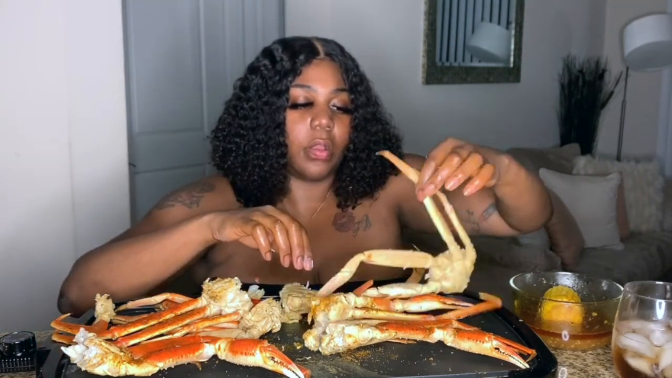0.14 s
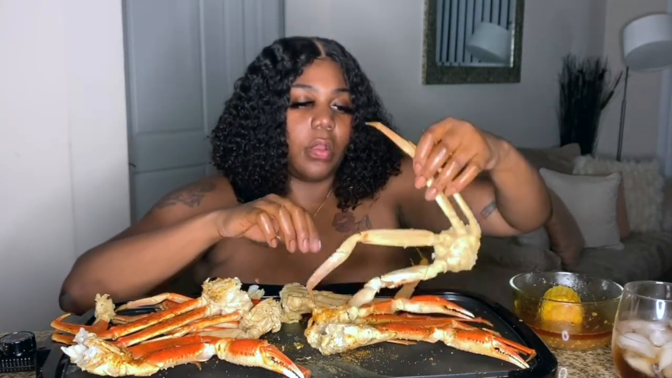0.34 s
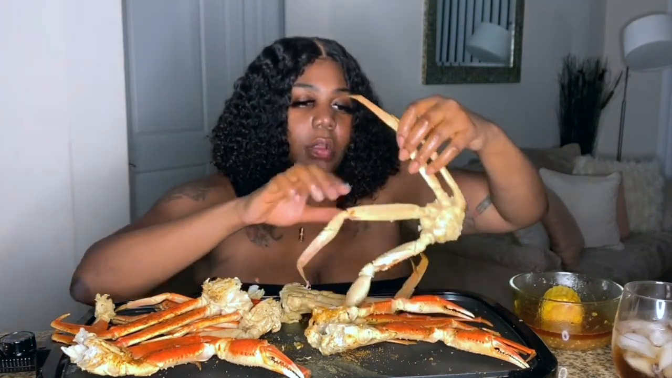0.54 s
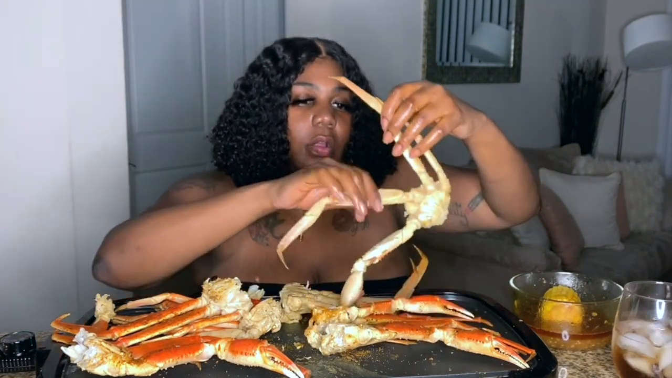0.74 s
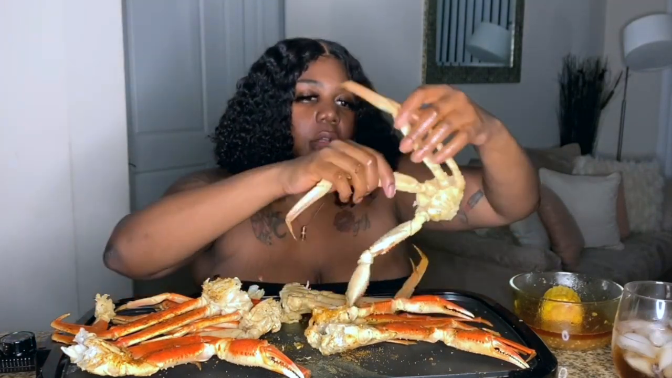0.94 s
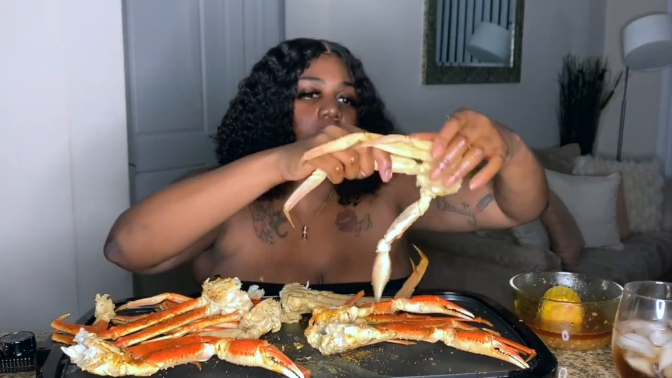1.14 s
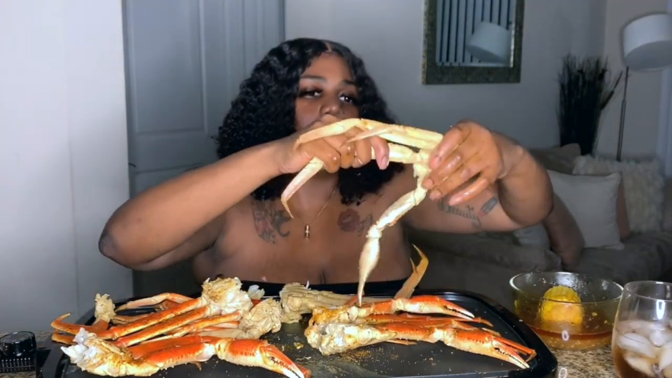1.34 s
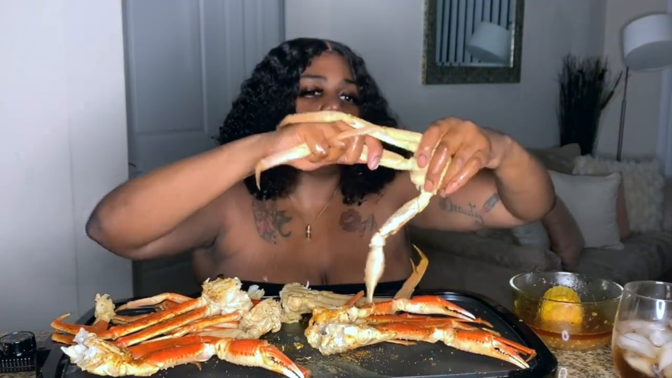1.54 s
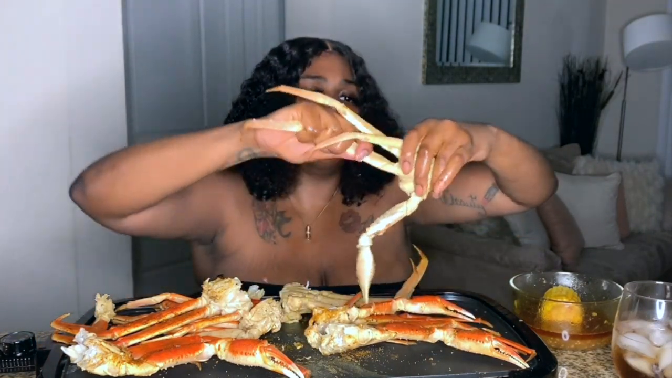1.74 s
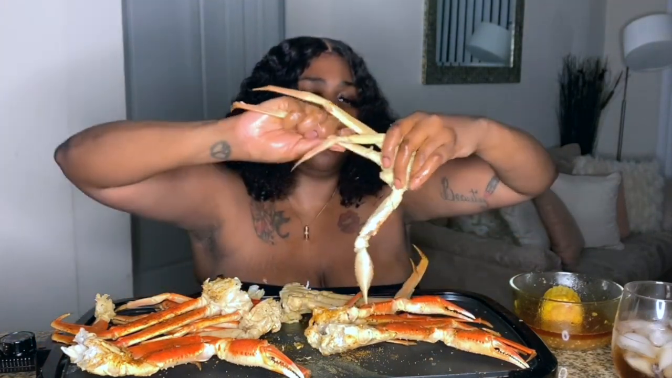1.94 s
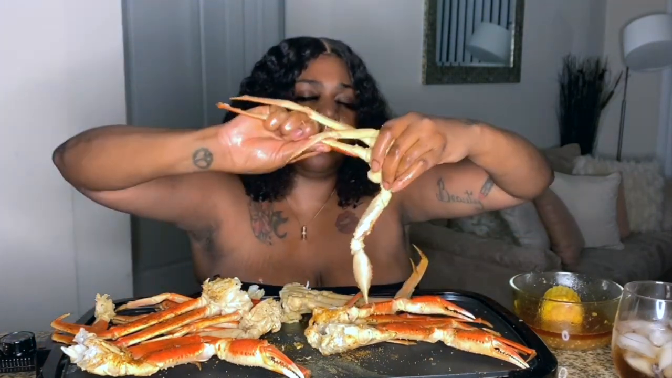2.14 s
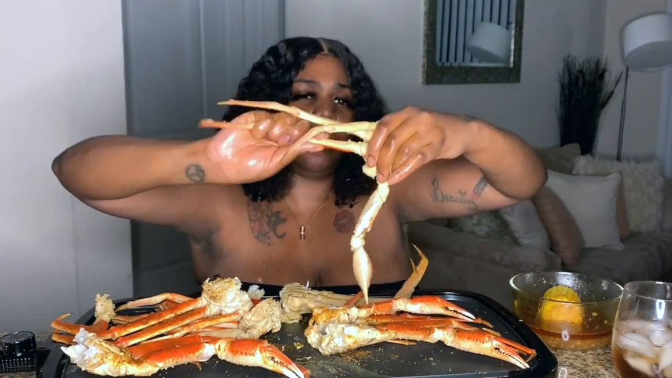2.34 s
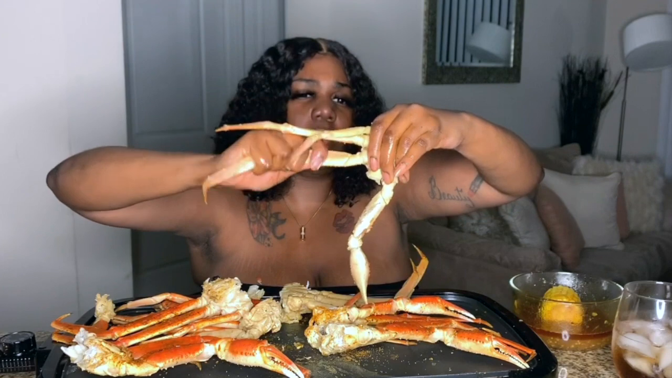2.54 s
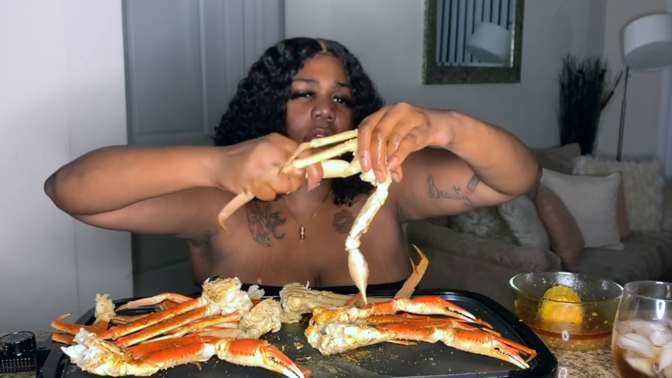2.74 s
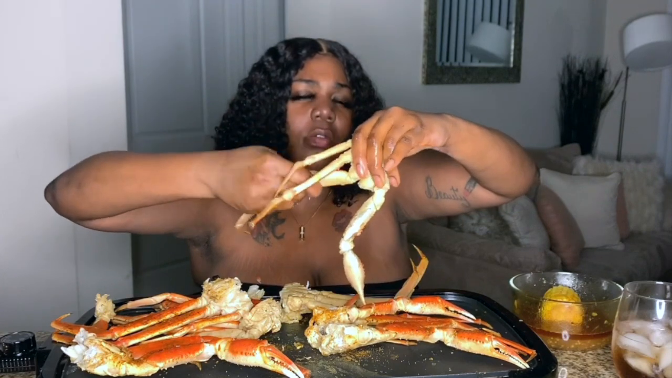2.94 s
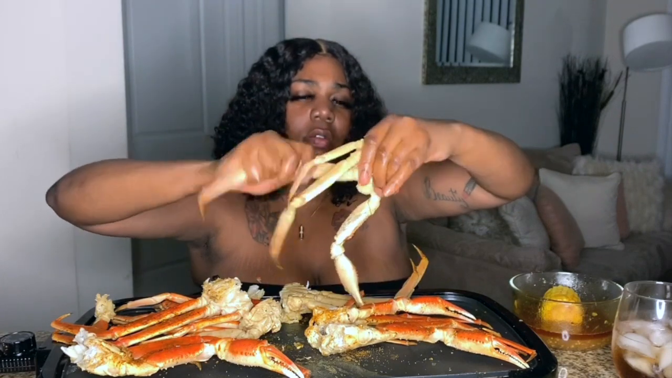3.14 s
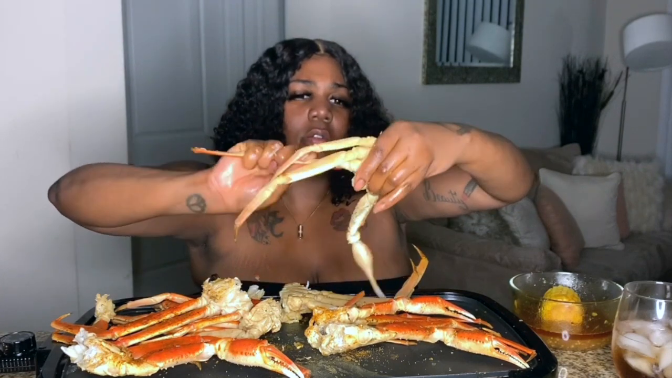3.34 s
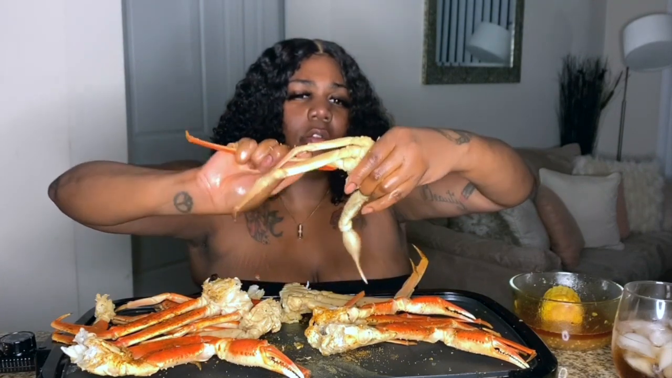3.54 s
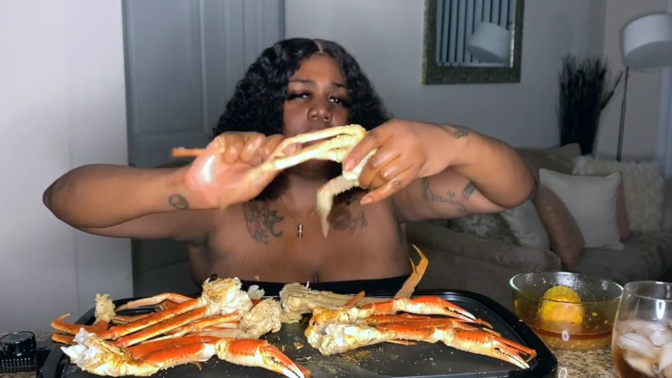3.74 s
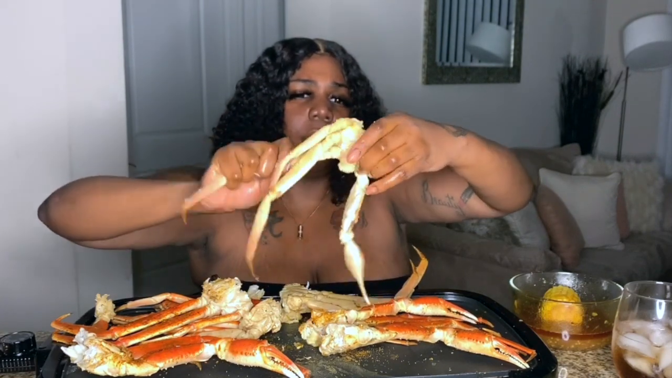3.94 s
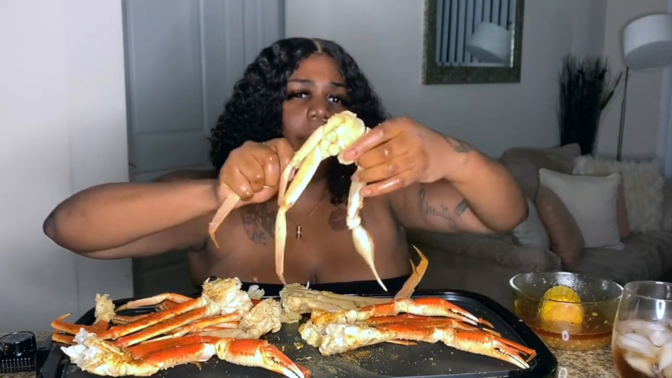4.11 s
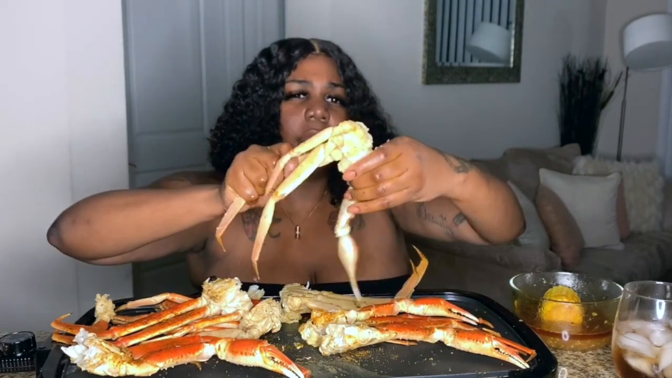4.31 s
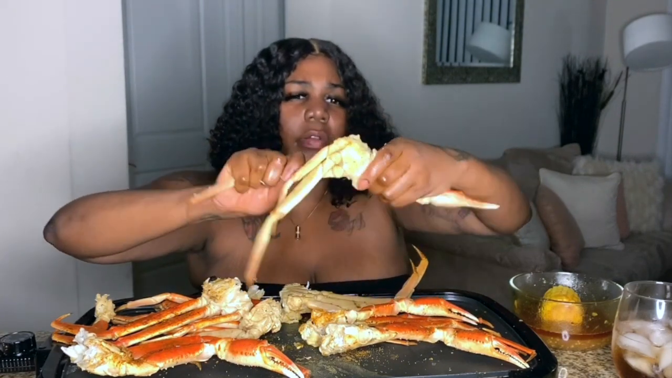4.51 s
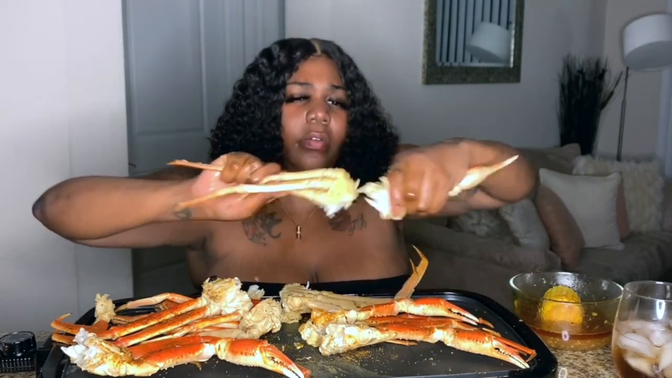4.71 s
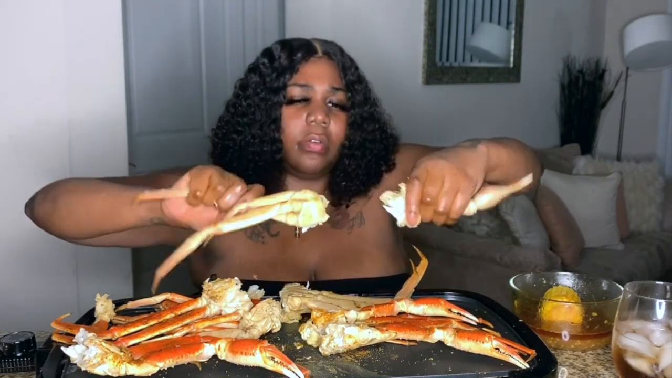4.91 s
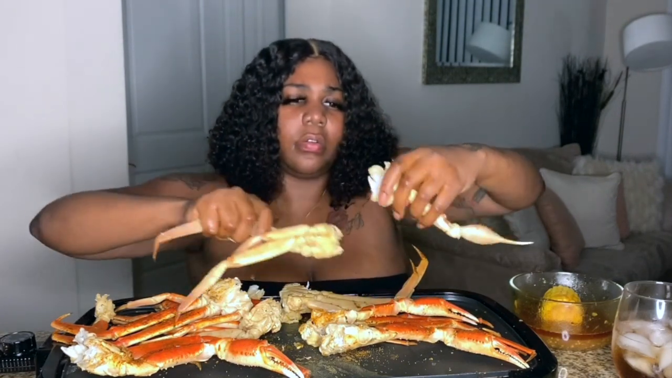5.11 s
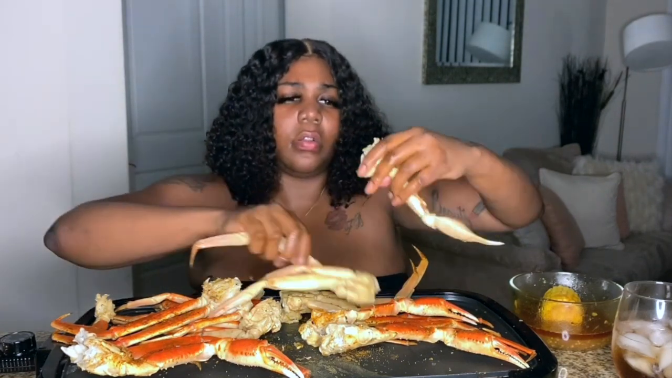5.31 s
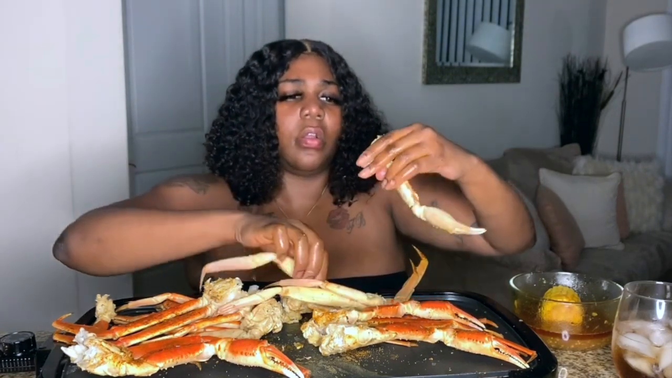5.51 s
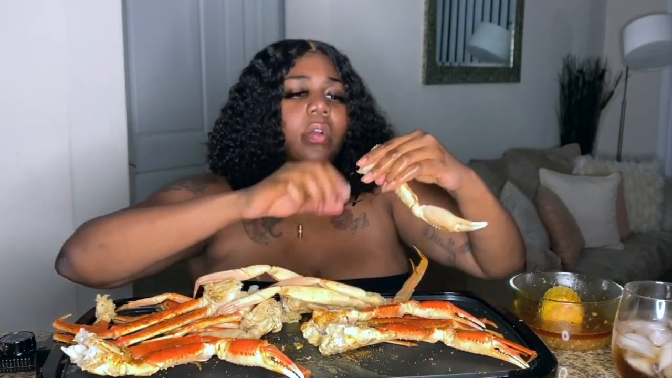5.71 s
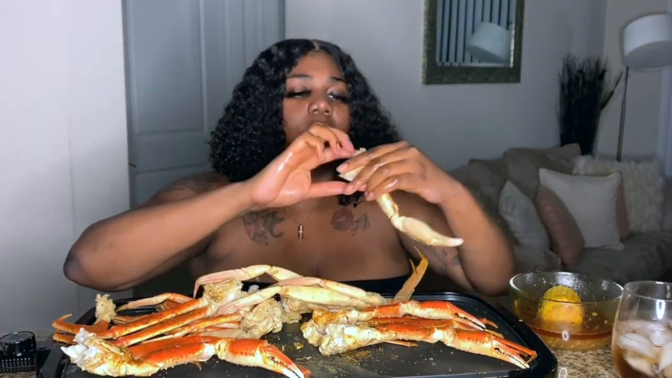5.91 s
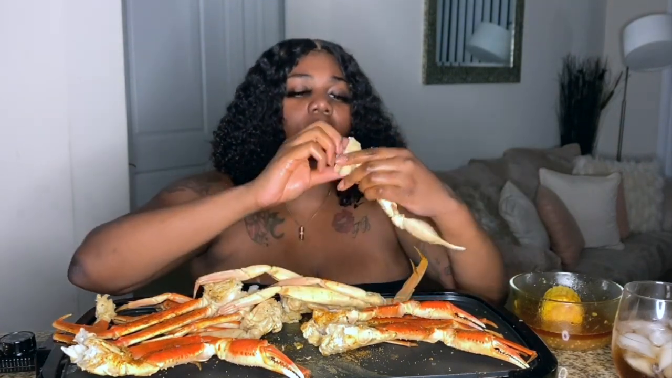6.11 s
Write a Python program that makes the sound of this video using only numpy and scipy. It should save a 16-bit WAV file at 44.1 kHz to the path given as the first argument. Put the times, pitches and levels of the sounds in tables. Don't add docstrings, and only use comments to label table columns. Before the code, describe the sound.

Hard hollow shells are bent until they give way: gritty crackling swells, then bright dry snaps and duller hollow pops. The breaks come unevenly, strongest around three and a half to four seconds and again past four and a half, then thin to light crumbling. Legs knock lightly on a pile. Near microphone, short room echo, faint low duct hum.

```python
import sys
import numpy as np
from scipy import signal
from scipy.fft import rfft, irfft, next_fast_len
from scipy.io import wavfile
from scipy.ndimage import uniform_filter1d

SR = 44100
rng = np.random.default_rng(int(sys.argv[2]) if len(sys.argv) > 2 else 0)


def store_pcm(level_fs):
    pcm = np.round(np.clip(level_fs, -1, 1) * 32767).astype(np.int16)
    wavfile.write(sys.argv[1], SR, np.atleast_2d(pcm).T)


def undo_db(level):
    steps = np.asarray(level, float) / 20
    return 10 ** steps


N = 271656


def unit(x):
    return x / np.sqrt(np.mean(x ** 2) + 1e-20)


def along(points, hz):
    f, value = np.transpose(points)
    return np.interp(np.log(hz + 1), np.log(f + 1), value)


def filtered(x, response):
    size = next_fast_len(x.shape[-1] + 8192)
    spectrum = rfft(x, size) * response(np.fft.rfftfreq(size, 1 / SR))
    return irfft(spectrum, size)[..., :x.shape[-1]]


def blended(pair, alike):
    def weights(hz):
        turn = np.arccos(np.clip(along(alike, hz), -1, 1)) / 2
        return np.array([np.cos(turn), np.sin(turn)])
    mid, side = filtered(pair, weights)
    return np.array([mid + side, mid - side])


def grains(count, centre_hz, spread, cycles, scatter_db, size=128):
    draw, t = rng.random((count, 4)), np.arange(size) / SR
    start = (draw[:, :1] * N).astype(int)
    hz = centre_hz[start] * np.exp(spread * rng.standard_normal((count, 1)))
    hz = np.clip(hz, 300, SR / 2.6)
    level = undo_db(-scatter_db * np.log(draw[:, 1:2] + .01))
    age = t * hz / (cycles * (.5 + draw[:, 2:3]))
    wave = level * np.sin(2 * np.pi * hz * t) * age * np.exp(-age)
    places = start + np.arange(size)
    return unit(np.bincount(places.ravel(), wave.ravel(), N + size)[:N])


# start t/s, build-up t/s, hold t/s, release t/s, crunch level/dB at full strain
BREAK_TIMES = [(0.0, 0.00067, .005, 0.04, -73), (0.137, 0.028, .075, 0.038, -87.5),
               (0.239, 0.0074, .035, 0.027, -62), (0.265, 0.017, .004, 0.23, -51.5),
               (0.861, 0.025, .003, 0.077, -77.5), (1.073, 0.064, .003, 0.11, -49),
               (1.454, 0.028, 0.038, 0.14, -45), (2.017, 0.022, .003, 0.077, -57),
               (2.097, 0.031, .07, 0.2, -46), (2.375, .008, .004, 0.063, -71.5),
               (2.527, 0.014, .03, .04, -85.5), (2.671, .06, .004, 0.22, -41),
               (2.961, 0.0041, .085, 0.05, -61), (3.287, 0.021, .09, .14, -53),
               (3.462, 0.025, 0.18, 0.17, -47.5), (3.859, 0.017, 0.057, .17, -44),
               (4.548, 0.12, .003, 0.054, -48), (4.626, 0.064, .004, 0.22, -37.5),
               (5.063, 0.03, .003, 0.065, -53), (5.193, 0.0044, 0.092, .06, -62.5),
               (5.261, 0.025, 0.0044, 0.077, -61), (5.403, .016, .004, 0.19, -76),
               (5.588, 0.045, .003, 0.067, -76.5), (6.046, 0.023, .002, 0.035, -88)]
# hollow body f/Hz, leg walls f/Hz, plates f/Hz,
# hollowness level/dB, brittleness level/dB
SHELL_PIECES = [(1860, 3500, 2400, 12, -7), (1750, 3000, 2700, 7.5, 3), (1900, 3600, 5200, 4.5, 2),
                (1900, 3400, 4600, -0.5, -7), (2400, 3600, 13000, 14, 5.5), (2250, 5000, 4100, 0, -8.5),
                (1930, 7300, 7500, -12.5, -9), (4000, 5400, 7400, 0, -0.5), (2270, 3800, 8100, -5.5, 2.5),
                (2340, 3500, 26000, -16, 2), (2300, 5800, 9000, -5.5, 7.5), (2400, 4200, 7300, -9.5, 2),
                (2315, 4500, 4000, 3.5, 6), (2230, 4500, 4900, -7.5, -4), (2240, 3600, 5000, -2.5, 9),
                (1800, 3900, 9900, -5.5, 3), (3900, 4200, 11000, -0.5, 10), (2400, 4200, 6200, -16, 3.5),
                (3900, 4600, 7400, -2, -9.5), (2090, 5100, 4000, -4.5, -27), (2800, 5600, 4700, 3.5, 4.5),
                (2000, 3600, 6700, 5, -16), (4400, 5200, 5000, 0, -4.5), (4370, 6200, 8600, 7, -21)]
STRAIN_FOLLOWING = (1.05, 0.83, 1.3, 1.69)


def crunch():
    build_db, release_db, release_bend = 27, 32, 1.337
    wall_db = -1
    clump_db, clumps_per_s = 4, 120
    t, levels, pitch = np.arange(N) / SR, np.zeros((4, N)), np.zeros((3, N))
    for timing, (*piece_hz, hollow_db, brittle_db) in zip(BREAK_TIMES, SHELL_PIECES):
        s, build_s, hold_s, release_s, db = timing
        end_s = s + build_s + hold_s + 2 * release_s
        span = slice(round(s * SR), round(end_s * SR))
        age = t[span] - s
        to_build = np.clip(1 - age / build_s, 0, 1)
        released = np.clip((age - build_s - hold_s) / release_s, 0, 2)
        strain_db = -build_db * to_build - release_db * released ** release_bend
        full_db = db + np.array([hollow_db, hollow_db + wall_db, 0, brittle_db])
        levels[:, span] += undo_db(full_db[:, None] + np.outer(STRAIN_FOLLOWING, strain_db))
        pitch[:, span.start:] = np.array(piece_hz)[:, None]
    body = grains(7000, pitch[0], spread=.15, cycles=2.4, scatter_db=2.2, size=224)
    walls = grains(10000, pitch[1], spread=.13, cycles=3, scatter_db=2.2, size=160)
    plates = grains(18000, pitch[2], spread=.19, cycles=2.1, scatter_db=2.5, size=80)
    splinters = grains(24000, np.full(N, 11500.), spread=0.38, cycles=1.6, scatter_db=-4.4, size=40)
    knots = np.arange(0, N, SR // clumps_per_s)
    clumps = rng.standard_normal((4, len(knots)))
    levels *= undo_db([np.interp(np.arange(N), knots, clump_db * row) for row in clumps])
    return undo_db(-1) * (levels * [body, walls, plates, splinters]).sum(0)


def cracks_and_rings(rows):
    crack_s, after_s, after_db = 0.0021, 0.032, -13.5
    out, t = np.zeros((2, N + 1024)), np.arange(1024) / SR
    bright = signal.butter(3, (2800, 13000), 'band', fs=SR)
    crack_fade = undo_db(-60 * t / crack_s) + undo_db(after_db - 60 * t / after_s)
    crack_fade *= 1 - np.exp(-t / 0.0004)
    for s, db, hz, crack_db, pan_db in rows:
        crack = signal.lfilter(*bright, rng.standard_normal(len(t))) * crack_fade
        ring_s = .002 + .018 * (2200 / hz) ** 2
        decay = undo_db(-60 * t / ring_s) * (1 - np.exp(-t / 0.00011))
        overtone_hz = hz * (1.65 + .2 * rng.standard_normal())
        overtone = .5 * decay * np.sin(2 * np.pi * overtone_hz * t)
        ring = decay * (np.sin(2 * np.pi * hz * t) + overtone)
        share = 1 / (1 + undo_db(-crack_db + 8.5))
        hollow = 1.66 * (1 - .5 * share) * ring * undo_db([[pan_db / 2], [-pan_db / 2]])
        sharp = 1.68 * share * crack / np.abs(crack).max()
        out[:, round(s * SR):][:, :len(t)] += undo_db(db - 6.5) * (sharp + hollow)
    return out[:, :N]


# t/s, peak level/dB, shell ring f/Hz, crack over ring level/dB
SHARP_SNAPS = [(0.244, -46, 1800, 15), (0.2952, -26, 5540, 3.5), (0.3004, -27.5, 3450, 37),
               (1.112, -33, 6890, -1.5), (1.4613, -47.5, 4660, 7.5), (1.492, -20, 6850, 20),
               (1.507, -24.5, 5070, 18.5), (1.582, -28, 4630, 20), (2.046, -56, 3650, 1.5),
               (2.1095, -44, 5440, 15.5), (2.1887, -17, 5040, 24), (2.1987, -25, 5130, 10.5),
               (2.2335, -13.5, 4460, 12.5), (2.7081, -24, 5450, 33.5), (2.7294, -29, 7060, 5.5),
               (2.7539, -30, 6600, 27), (2.7837, -24, 6000, 33), (2.9006, -40, 5950, 5),
               (3.3059, -36, 3470, 11), (3.332, -31.5, 5250, 5), (3.649, -17.5, 5530, 9),
               (3.3727, -22.5, 6450, 18.5), (3.545, -11.5, 6740, 10), (3.6033, -12.5, 6300, 14.5),
               (3.6057, -13.5, 5000, 21.5), (3.6457, -18.5, 5040, 10.5), (3.895, -16, 7400, 16.5),
               (3.9038, -13.5, 4920, 23.5), (4.676, -14.5, 7200, 13), (4.714, -10.5, 5700, 15.5)]


def snaps():
    return cracks_and_rings([(*row, -17.5) for row in SHARP_SNAPS])


# t/s, peak level/dB, shell ring f/Hz, left over right level/dB
DULL_POPS = [(0.1595, -54, 6230, -11), (0.3235, -39, 2600, 3), (0.3883, -32.5, 2810, -12),
             (2.9746, -32.5, 2590, 13), (0.391, -33, 4730, -3), (0.832, -62, 6100, -4),
             (0.905, -54, 2140, 14), (1.075, -43, 2790, 4), (1.096, -43, 2800, 3),
             (1.144, -30.5, 3260, 13.5), (1.21, -37, 4740, 5.5), (1.5868, -42, 1900, 2),
             (2.2361, -26.5, 2445, 4), (2.674, -44.5, 5300, -13), (2.9712, -29.5, 4800, 8),
             (3.2467, -57, 2310, 1), (3.3958, -37, 2060, -4.5), (3.579, -31, 5600, -11),
             (3.7219, -36, 2090, 6.5), (3.939, -36.5, 2480, 2.5), (3.9461, -20.5, 2580, -10),
             (3.9495, -25, 2500, -11.5), (4.5775, -46.5, 4000, -2.5), (5.089, -44, 5530, -22),
             (5.196, -42.5, 3900, -16), (5.205, -64, 3920, -10), (5.2355, -33, 4070, -9),
             (5.2425, -37, 5450, 16), (5.29, -59, 2850, -4), (5.4277, -46, 5400, -5)]


def pops():
    return cracks_and_rings([(s, db, hz, -14, pan_db) for s, db, hz, pan_db in DULL_POPS])


# t/s, peak level/dB, f/Hz, t60 t/s
KNOCKS_AND_RINGS = [(.325, -44, 501, 0.17), (0.388, -41.5, 1220, 0.017), (1.14, -38, 1386, 0.024),
                    (1.504, -50.5, 998, 0.056), (2.232, -52.5, 1080, 0.011), (3.646, -44.5, 810, 0.02),
                    (3.897, -35.5, 974, 0.039), (3.904, -34, 617, 0.056), (3.905, -30.5, 526, 0.1),
                    (3.905, -36.5, 1384, 0.031), (3.945, -28, 1605, 0.015), (3.947, -37, 970, 0.013),
                    (5.241, -57, 1518, 0.11), (5.452, -45.5, 524, 0.069), (3.372, -50, 1440, 0.1),
                    (1.075, -48.5, 2866, 0.1), (1.076, -57.5, 4980, 0.044), (1.094, -57, 2770, 0.056),
                    (1.094, -51.5, 6630, 0.051), (1.16, -43, 2820, 0.21), (1.211, -49.5, 5160, 0.015)]


def knocks():
    out, t = np.zeros(N + 8192), np.arange(8192) / SR
    for s, db, hz, t60 in KNOCKS_AND_RINGS:
        wander = np.cumsum(rng.normal(0, .09, len(t)))
        ring = np.sin(2 * np.pi * hz * t + wander) * (1 - np.exp(-t / 0.0014))
        out[round(s * SR):][:len(t)] += undo_db(db + 2.0 - 60 * t / t60) * ring
    return out[:N]


def table(x):
    delay_s, size = rng.uniform(.0005, .009, (2, 10, 1)), rng.normal(0, .3, (2, 10, 1))

    def echoes(hz):
        together = (size * np.exp(-2j * np.pi * hz * delay_s)).sum(1)
        return together / (1 + (hz / 5200) ** 6)
    return filtered(x, echoes)


# f/Hz, t60 t/s
ROOM_DECAY = [(500, 0.5), (2000, 0.31), (5000, 0.35), (7000, 0.3), (10000, 0.16), (16000, 0.093)]
# f/Hz, likeness [-1 to 1]
ROOM_LIKENESS = [(1000, .1), (4500, 0), (7500, .9), (16000, .9)]


def room(x):
    out, hop = np.zeros((2, N + SR)), SR // 10
    for start in range(0, N, hop):
        hz, t, z = signal.stft(rng.standard_normal((2, SR // 2)), SR, nperseg=256)
        fade = undo_db(-60 * t / along(ROOM_DECAY, hz)[:, None])
        tail = signal.istft(z * fade, SR, nperseg=256)[1]
        tail = tail / np.linalg.norm(tail[0])
        wet = signal.fftconvolve(x[None, start:start + hop], tail, axes=1)
        out[:, start + 130:][:, :wet.shape[1]] += wet
    return blended(out[:, :N], ROOM_LIKENESS)


# f/Hz, level/dB
MIC_TONE = [(120, -49), (400, -7), (1200, 6.5), (1800, 1), (6000, 0), (12000, 1), (15700, 3), (16300, -39),
            (17000, -51.5)]


def microphone(near):
    return filtered(near, lambda hz: undo_db(along(MIC_TONE, hz)))


# t/s, level/dB
HUM_LEVEL = [(0.0, -58.5), (0.31, -57.5), (0.38, -50), (0.86, -60.5), (1.22, -52), (1.47, -57), (1.54, -51),
             (1.66, -54), (1.95, -57.5), (2.01, -62.5), (2.07, -54.5), (3.98, -53.5), (4.58, -60),
             (5.35, -53), (5.82, -60), (6.16, -60)]
# f/Hz, level/dB per Hz
DUCT_TONE = [(18, -63), (30, -40), (60, -21.5), (141, -14), (215, -12), (275, 2.5), (328, -9), (364, -4),
             (437, -13), (500, -12), (1280, -20), (1960, -38.5), (11500, -58.5), (12500, -70)]
# f/Hz, likeness [-1 to 1]
DUCT_LIKENESS = [(60, .9), (300, .7), (700, .4), (3000, .1), (8000, .85)]


def hum():
    z = signal.stft(rng.standard_normal((2, N)), nperseg=2048)[2]
    patches = uniform_filter1d(rng.standard_normal(z.shape[1:]), size=5, axis=0)
    patches = uniform_filter1d(patches, size=3, axis=1)
    air = signal.istft(z * undo_db(1.8 * unit(patches)), nperseg=2048)[1][:, :N]
    air = filtered(air, lambda hz: undo_db(along(DUCT_TONE, hz)))
    air = unit(blended(air, DUCT_LIKENESS))
    s, db = np.transpose(HUM_LEVEL)
    level = undo_db(np.interp(np.arange(N) / SR, s, db) - 1.0)
    return level * air * undo_db([[-.9], [.9]])


def scene():
    shells = crunch() + snaps() + pops() + knocks()
    source = shells.mean(0)
    near = shells + undo_db(-2) * table(source) + undo_db(-7) * room(source)
    return microphone(near) + hum()


# f/Hz, phase [radians]
TREBLE_PHASE = [(0, 0), (2500, .7), (5200, 1.8), (6400, 0), (7900, -2.85), (8750, -3.2), (10300, -6.1),
                (11400, -6.4), (12700, -9), (13600, -9.5), (15100, -12.4), (16500, -12.8)]


def phase_treble(x):
    def shift(hz):
        lead = np.interp(hz, *np.transpose(TREBLE_PHASE))
        return np.exp(.5j * np.array([lead, -lead]))
    return filtered(x, shift)


# f/Hz, level/dB
TREBLE_GATES = [(6500, -56), (8600, -36), (10500, -43), (12500, -30.5), (16000, -21.5)]


def drop_weak_treble(x):
    hz, _, z = signal.stft([x[0] + x[1], x[0] - x[1]], SR, nperseg=1024)
    whole = np.sqrt((np.abs(z[:, hz > 2000]) ** 2).sum((0, 1)))
    masker = np.maximum(whole, 0.7 * np.roll(whole, 1))
    width_hz = 690
    for low_hz in np.arange(6200, 17000, width_hz):
        band = (hz >= low_hz) & (hz < low_hz + width_hz)
        strength = np.sqrt((np.abs(z[:, band]) ** 2).sum(1, keepdims=True))
        gate_db = along(TREBLE_GATES, low_hz) + 3 * rng.standard_normal((2, 1, len(masker)))
        z[:, band] *= strength > masker * undo_db(gate_db)
    mid, side = signal.istft(z, SR, nperseg=1024)[1][:, :N] / 2
    return np.array([mid + side, mid - side])


def low_pass(x):
    return signal.sosfilt(signal.butter(12, 16810, fs=SR, output="sos"), x)


def record(dry):
    mix = drop_weak_treble(phase_treble(dry))
    return low_pass(mix)


dry = scene()
out = record(dry)
store_pcm(out)
```